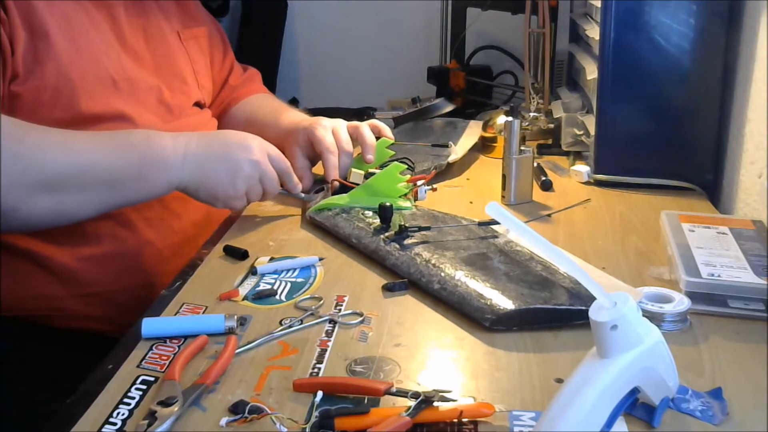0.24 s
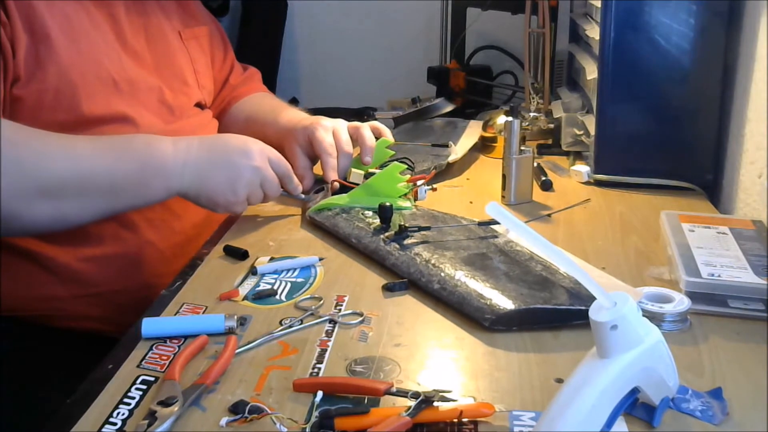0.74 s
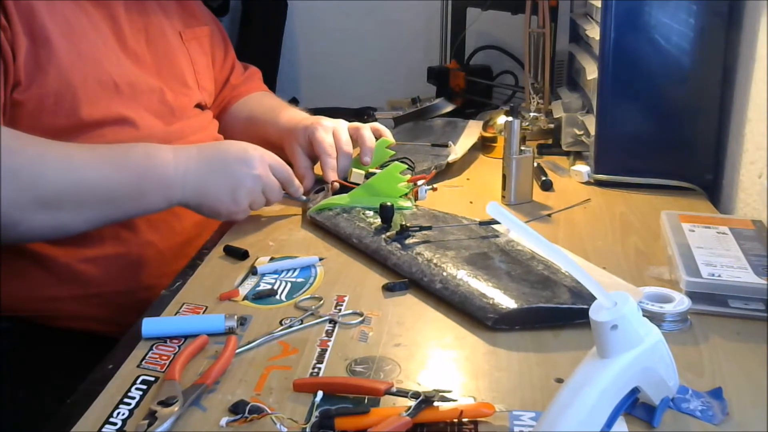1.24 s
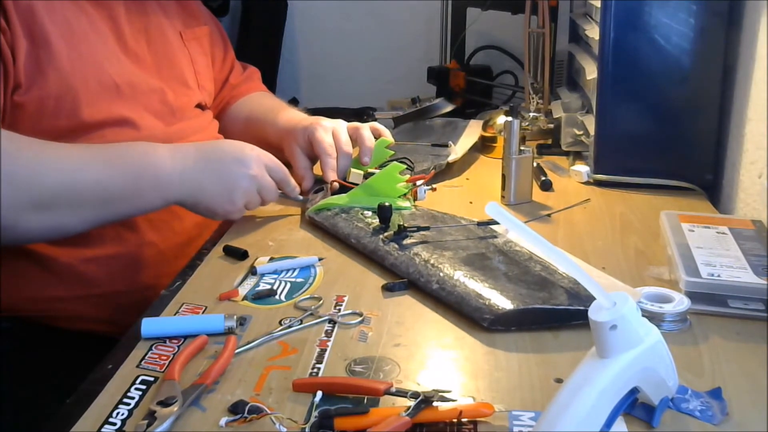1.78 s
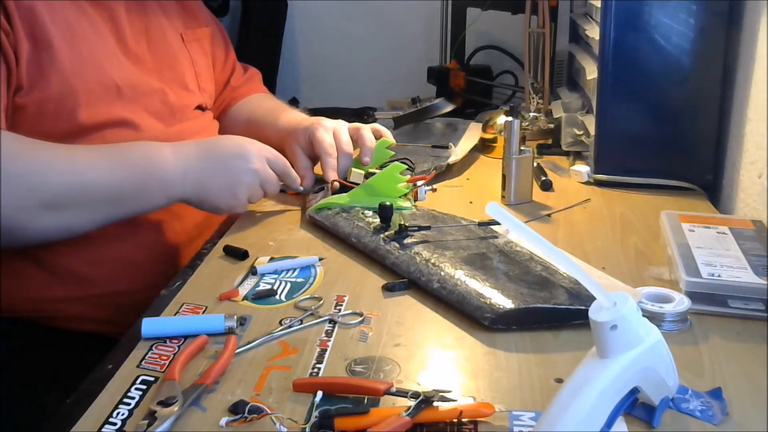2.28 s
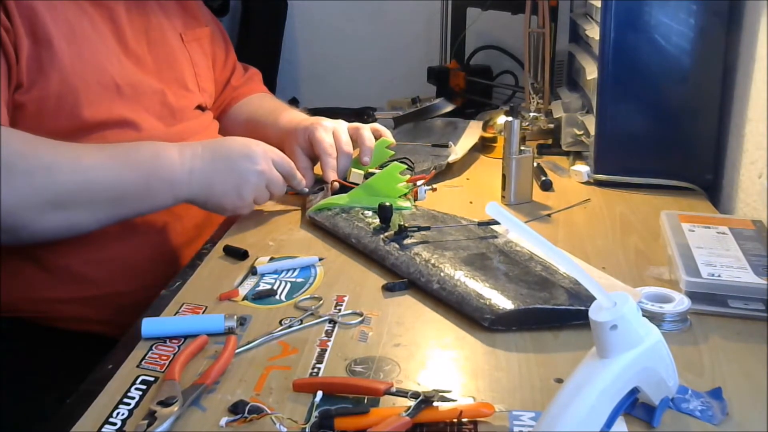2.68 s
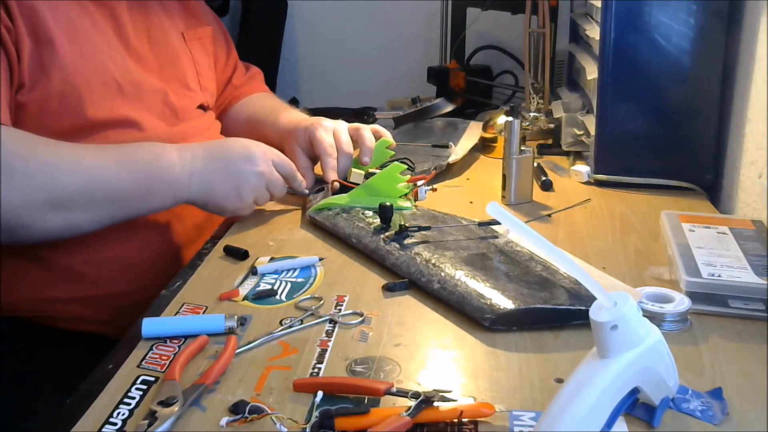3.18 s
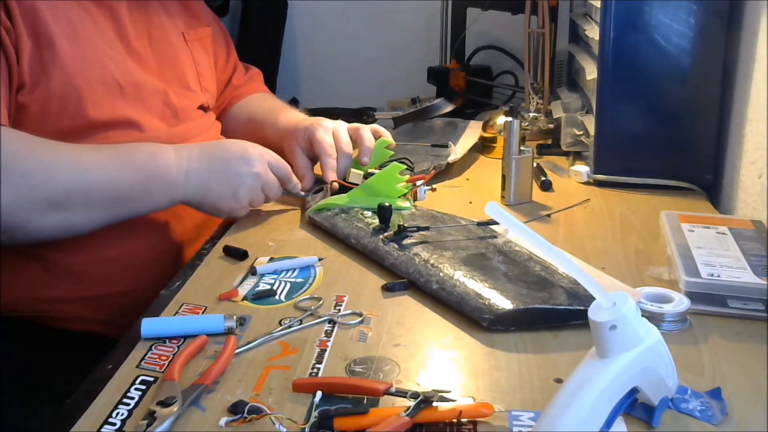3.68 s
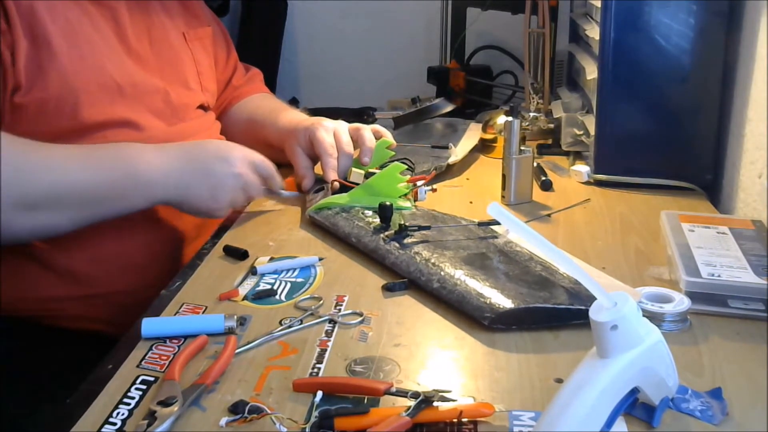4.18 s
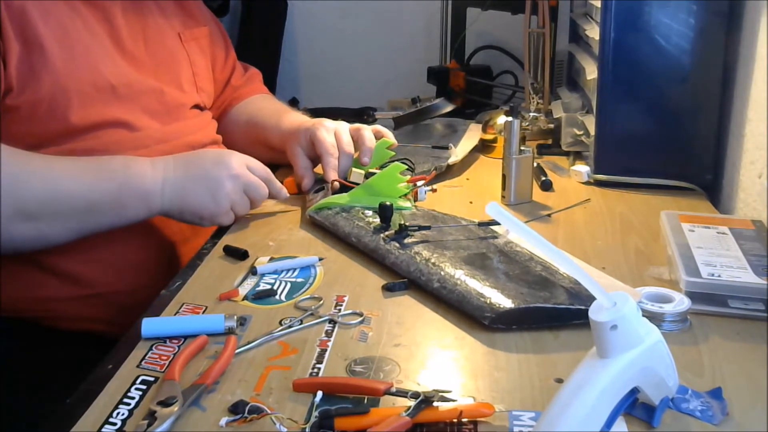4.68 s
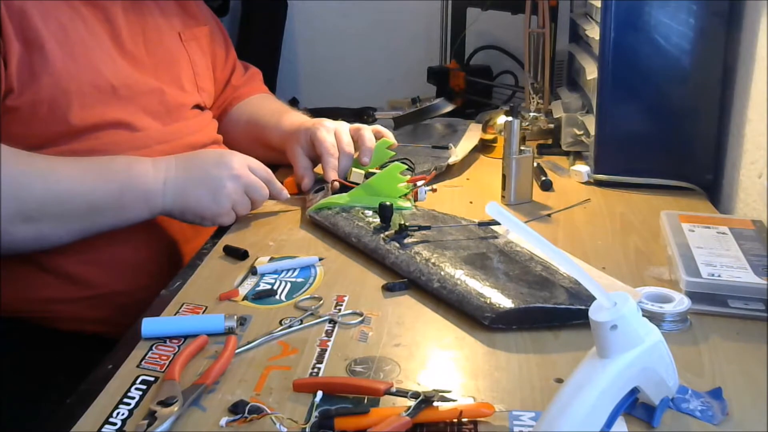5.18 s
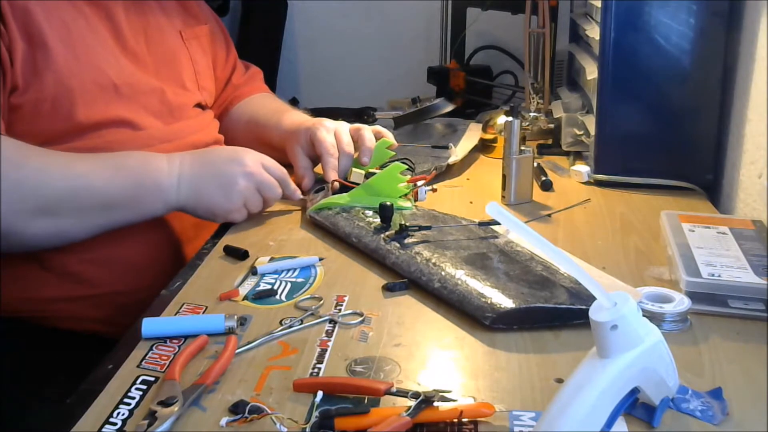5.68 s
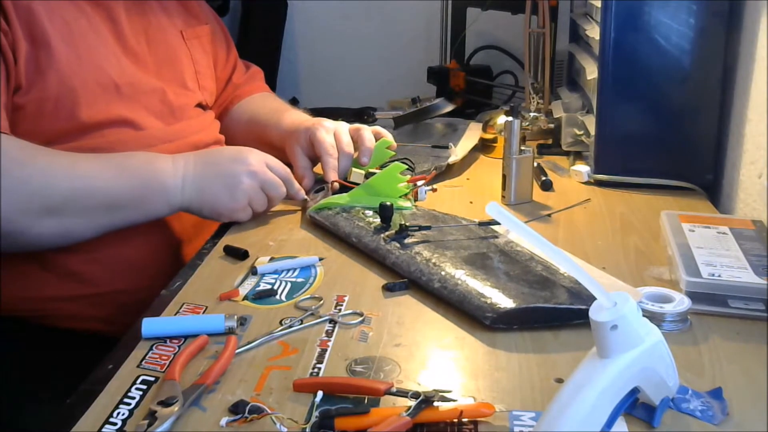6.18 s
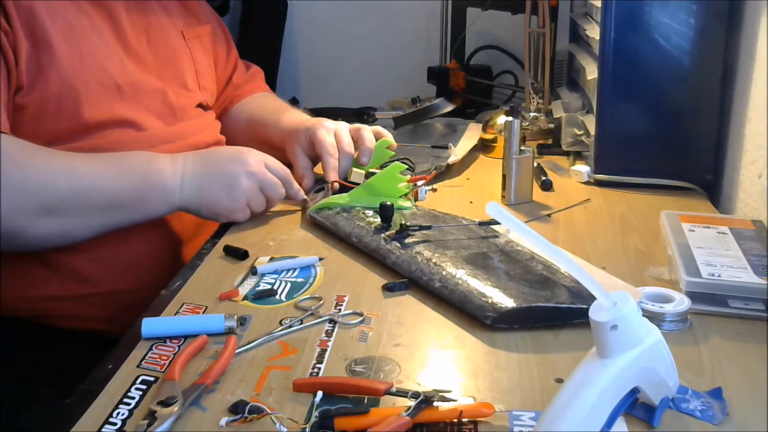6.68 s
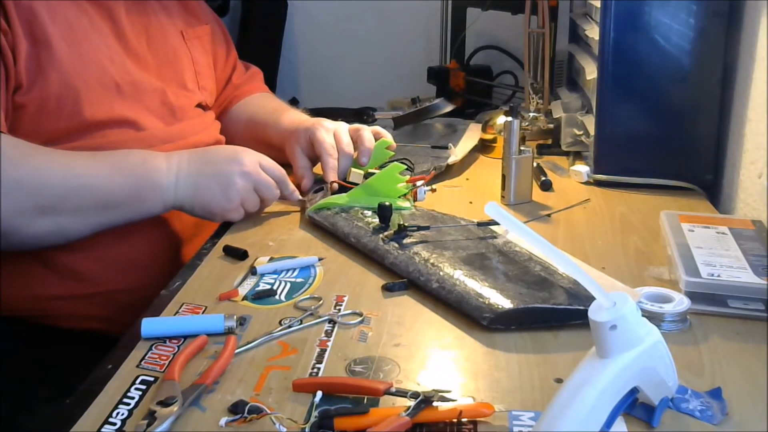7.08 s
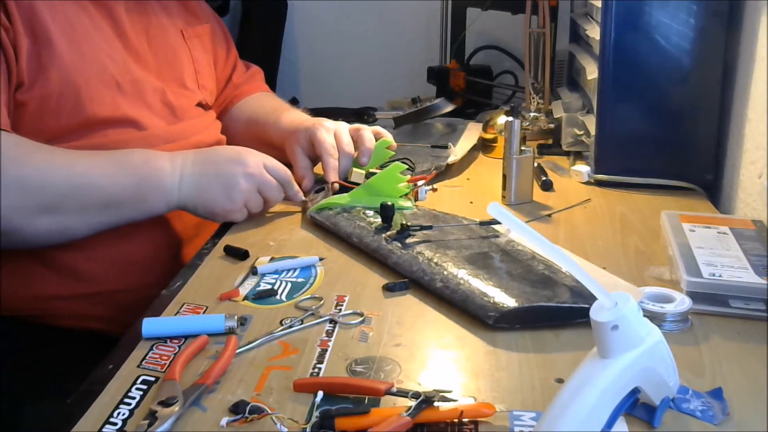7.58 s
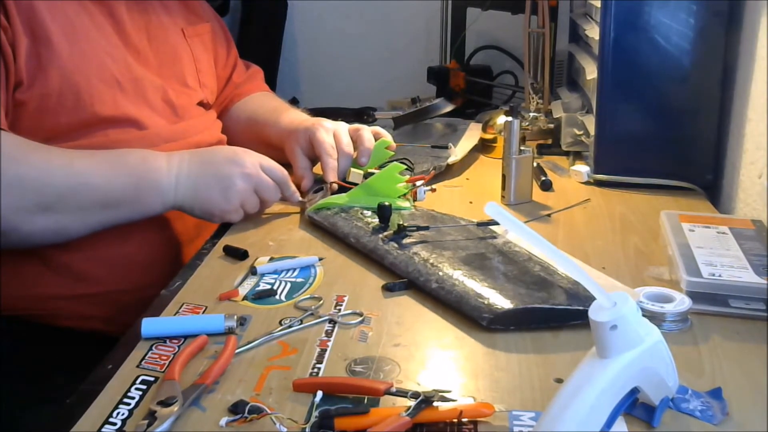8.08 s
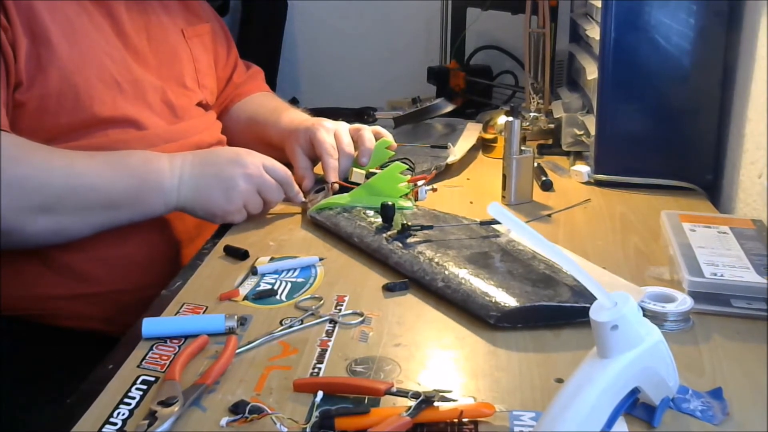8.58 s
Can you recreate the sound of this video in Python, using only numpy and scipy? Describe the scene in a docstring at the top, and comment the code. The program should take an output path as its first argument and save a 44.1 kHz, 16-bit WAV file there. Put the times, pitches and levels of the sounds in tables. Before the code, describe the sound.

Short, crisp rasps of a blade cutting foam, with brief pauses, sharp little cracks and hollow bumps on a workbench.

```python
"""Short, scratchy strokes: a knife saws and picks at a hollow-sounding foam wing on a workbench.
Each stroke crushes a swarm of tiny foam cells, whose ticks blur into a rasp. Now and then a foam bead
snaps, the blade creaks, or a push bumps the wing and the bench thuds. Fingers rub softly after strokes.
The bench top and a small, dry workshop add brief echoes, over a faint rumble and hiss
that a noise suppressor holds down."""
import sys
import numpy as np
from scipy import signal
from scipy.fft import rfft, irfft, next_fast_len
from scipy.io import wavfile
from scipy.ndimage import uniform_filter1d, map_coordinates

SR = 44100
rng = np.random.default_rng(int(sys.argv[2]) if len(sys.argv) > 2 else 0)


def bounce(signal):
    """Save signal as a 16-bit WAV file at the path given by the first command-line argument."""
    frames = np.transpose(np.atleast_2d(signal))
    limited = np.clip(frames, -1, 1)
    pcm = np.round(limited * 32767).astype(np.int16)
    wavfile.write(sys.argv[1], SR, pcm)


N = 390285

# Tone of the steady rumble and hiss: frequency_hz, level_db
BACKGROUND_TONE = [(25, -25), (60, -14), (90, -9), (130, -3), (230, 0), (400, -4), (600, -9), (1000, -12.5),
                   (2000, -16.5), (6500, -18), (9000, -28), (15600, -33)]
# How long the room takes to fade by 60 dB: frequency_hz, fade_s
ROOM_FADE = [(130, 0.23), (400, 0.18), (1200, 0.16), (3000, 0.18), (7000, .17), (14000, 0.062)]
# Echoes off the bench top and the things on it: delay_s, gain
BENCH_ECHOES = [(.00105, 0.25), (.002, 0.3), (.006, 0.25), (.008, .2), (0.0118, 0.24)]
# Foam creaking against the blade: start_s, pitch_hz, level_db
CREAKS = [(.464, 436.6, -41), (.526, 910, -45.5), (.705, 720, -43.5), (.812, 748, -38), (1.392, 873, -48),
          (1.449, 500, -50), (3.679, 780, -51), (4.664, 802, -50), (5.85, 420, -43), (6.295, 787, -53.5),
          (7.352, 844, -47.5), (8.084, 742, -48.5), (8.402, 748, -45.5)]
# Blade and hand bumping the wing: start_s, level_db, pitch_hz
BUMPS = [(0.268, -47, 240), (0.37, -35.5, 804), (0.469, -39.5, 382), (0.729, -37, 417), (.784, -31, 483),
         (0.948, -37.5, 390), (0.994, -38, 553), (1.208, -31, 950), (1.389, -38.5, 405),
         (1.533, -42.5, 470), (2.792, -34, 440), (3.093, -35, 340), (3.449, -39.5, 560),
         (3.582, -42.5, 326), (3.642, -36.5, 477), (3.758, -45, 446), (3.825, -34, 553),
         (4.032, -43.5, 440), (4.232, -44, 254), (5.951, -44, 458), (6.003, -40, 246), (6.67, -42.5, 550),
         (7.008, -37.5, 497), (7.185, -30.5, 446), (7.469, -23, 407), (7.654, -32.5, 360),
         (7.796, -21.5, 446), (7.958, -29, 388), (8.121, -22.5, 397), (8.297, -31, 408),
         (8.458, -24.5, 447), (8.708, -38.5, 295)]
# Tone of the wing's body: frequency_hz, level_db
WING_TONE = [(120, -22.5), (200, -8.5), (300, -8), (385, 1.5), (425, -5.5), (470, -1), (550, -8.5),
             (750, -7.5), (1000, -10.5), (1600, -16.5), (3000, -28.5), (6000, -59.5)]
# Tone of the bench's thud: frequency_hz, level_db
BENCH_TONE = [(60, -37), (100, -13), (130, -1.5), (155, -6.5), (190, 0), (260, -9), (400, -25), (1000, -69)]
# Foam beads breaking: start_s, level_db
SNAPS = [(.1311, -26), (.3322, -28), (0.5935, -24), (0.8176, -24.5), (1.2097, -20.5), (1.8424, -18),
         (2.3618, -24.5), (2.3928, -21), (2.4446, -13), (2.7503, -9.5), (3.0989, -9), (3.162, -10.5),
         (3.8304, -19.5), (4.1161, -26.5), (4.6183, -18.5), (5.2324, -29), (5.2846, -22), (5.3919, -31.5),
         (5.6412, -32), (6.003, -35.5), (6.101, -32), (6.694, -36.5), (6.714, -28), (6.812, -34),
         (7.138, -40), (7.3286, -27), (7.4703, -21.5), (7.8197, -24), (8.1238, -29), (8.772, -26.5),
         (8.791, -13.5)]
# Tone of crushed foam cells: frequency_hz, level_db
FOAM_TONE = [(240, -39.5), (450, -40.5), (700, -16.5), (1050, -15), (1450, -4.5), (1950, -13.5),
             (2800, -6.5), (4000, -8), (5300, -6.5), (6500, -1.5), (7600, -7), (8800, -11.5),
             (10800, -27.5), (15600, -52)]
# Knife strokes, each with its own low rasp and high fizz: start_s, length_s, level_db, rasp_db, fizz_db
STROKES = [(0, 0.012, -29, -0.5, -1.5), (0.114, 0.068, -23, -11.5, -6.5), (0.206, 0.023, -37.5, -13.5, -5),
           (0.313, 0.082, -27.5, -1.5, -1.5), (0.55, 0.062, -26, -7.5, -5.5), (0.709, 0.16, -54, 6, -5.5),
           (0.946, 0.105, -49, 3, -7), (1.163, 0.11, -37.5, 1.5, -4.5), (1.384, 0.06, -62, 19.5, -5.5),
           (1.61, 0.24, -42.5, 2, -6.5), (2.333, 0.12, -40, -7.5, -13.5), (2.444, 0.067, -29, -8, -9.5),
           (2.73, 0.094, -37, -8.5, -9.5), (2.881, 0.095, -31.5, -8, -6), (3.054, 0.12, -36.5, -11, -5.5),
           (3.263, 0.07, -32.0, -6, 4.5), (3.341, 0.03, -27.5, 0.5, -10), (3.44, 0.09, -38.5, -8.5, -5),
           (3.633, 0.064, -43.5, 0.5, -5), (3.805, 0.15, -42.5, -6, -10.5), (4.016, 0.1, -38, -4.5, -3.5),
           (4.607, 0.088, -44, -3, -10), (5.233, 0.24, -47, -10, -6.5), (5.464, 0.13, -35, -8, -3.5),
           (5.515, 0.16, -33.5, 0, -4), (5.648, 0.25, -46, -18, -9), (5.986, 0.13, -35, 0.5, -3.5),
           (6.259, 0.12, -58, 3.5, -4), (6.438, 0.08, -42.5, 1.5, 2.5), (6.638, 0.11, -46.5, 4, -7),
           (6.798, 0.062, -33, -1, -4), (6.988, 0.067, -41, 3.5, 1.5), (7.133, 0.08, -34.5, 1.5, -0.5),
           (7.299, 0.095, -42, -1.5, -7.5), (7.442, 0.098, -33.5, 0.0, -5), (7.612, 0.11, -38.5, -7, -6.5),
           (7.758, 0.1, -32, 2.5, -3.5), (7.952, 0.057, -38, 0.5, -7), (8.108, 0.049, -42.0, 12, -9.5),
           (8.268, 0.078, -41.5, -4, -9), (8.412, 0.14, -38.5, -2.5, -7.0), (8.773, 0.13, -37.5, -3, -10.5)]


def amp(db):
    """Turn decibels into a gain to multiply by."""
    return 10 ** (np.asarray(db) / 20)


def unit(x):
    """Scale a sound so its average strength (rms) is 1."""
    return x / np.sqrt(np.mean(x ** 2) + 1e-20)


def along(points, hz):
    """Read between the rows of a (frequency, value) table, on a log frequency scale."""
    frequencies, values = np.transpose(points)
    return np.interp(np.log(hz + 1), np.log(frequencies + 1), values)


def wobble(per_s, size):
    """A smooth curve through per_s random points a second."""
    points = rng.standard_normal(int(size * per_s / SR) + 4)
    return map_coordinates(points, [np.arange(size) * per_s / SR])


def add(track, start_s, sound):
    """Mix a sound into the track at start_s."""
    part = track[max(round(start_s * SR), 0):]
    part[:len(sound)] += sound[:len(part)]


def filtered(x, gain_at):
    """Turn each frequency up or down by gain_at(hz)."""
    size = next_fast_len(len(x) + SR // 10)
    return irfft(rfft(x, size) * gain_at(np.fft.rfftfreq(size, 1 / SR)), size)[:len(x)]


def noise(size, gain_at):
    """Noise of strength 1, with its tone shaped by gain_at(hz)."""
    return unit(filtered(rng.standard_normal(size), gain_at))


def sharpest_tick(gains):
    """The shortest tick with these gains across frequency (minimum phase)."""
    cepstrum = irfft(np.log(np.maximum(gains, 1e-6)))
    half = len(cepstrum) // 2
    cepstrum[1:half] *= 2
    cepstrum[half + 1:] = 0
    return irfft(np.exp(rfft(cepstrum)))


def background(level_db=-59):
    """Soft, steady room rumble and microphone hiss."""
    return amp(level_db) * noise(N, lambda hz: amp(along(BACKGROUND_TONE, hz)))


def workshop(x, tail_db=-1.5, gap_s=0.0033, delay_spread=0.06):
    """The room adds a few close echoes and a short tail, which change as the hands move."""
    out = np.zeros(N)
    hop = SR // 8
    padded = np.pad(x, (hop, 2 * hop))
    for start in range(0, N + hop, hop):  # each overlapping piece gets fresh echoes
        hz, t, bands = signal.stft(rng.standard_normal(SR // 4), SR, nperseg=256)
        fade = amp(-60 * t / along(ROOM_FADE, hz)[:, None])
        tail = signal.istft(bands * fade, SR, nperseg=256)[1]
        tail *= np.clip(np.arange(len(tail)) / SR / gap_s - 0.5, 0, 1)
        room = amp(tail_db) * tail / np.linalg.norm(tail)
        room[0] = 1  # the direct sound
        for delay_s, gain in BENCH_ECHOES:
            add(room, delay_s * (1 + delay_spread * rng.standard_normal()), np.array([gain]))
        piece = padded[start:start + 2 * hop] * signal.get_window("hann", 2 * hop)
        heard = signal.fftconvolve(piece, room / np.linalg.norm(room))
        add(out, max(start - hop, 0) / SR, heard[max(hop - start, 0):])
    return out


def finger_rubs(level_db=-61, scatter_db=3, max_lag_s=0.095, length_s=0.035, typical_hz=420):
    """After each stroke the fingers shift their grip with a brief, dull rub on the wing."""
    out = np.zeros(N)
    n = int(length_s * SR)
    for start_s, stroke_s, *_ in STROKES:
        centre_hz = typical_hz * np.exp(0.38 * rng.standard_normal())
        rub = noise(n, lambda hz: 1 / (1 + (4.1 * np.log((hz + 1) / centre_hz)) ** 2))
        rub_s = start_s + stroke_s + max_lag_s * rng.random()
        add(out, rub_s, amp(level_db + scatter_db * rng.standard_normal()) * rub * np.hanning(n))
    return out


def blade_creaks(length_s=0.027, waver=0.099, rough_db=5, overtone_db=-20):
    """The blade sticks and slips in step with one of the wing's natural notes."""
    out = np.zeros(N)
    n = int(length_s * SR)
    for start_s, pitch_hz, level_db in CREAKS:
        phase = 2 * np.pi * np.cumsum(pitch_hz * (1 + waver * wobble(150, n))) / SR
        tone = np.sin(phase) + amp(overtone_db) * np.sin(2 * phase)
        tone *= amp(rough_db * wobble(200, n))
        add(out, start_s, amp(level_db) * unit(tone) * np.sin(np.linspace(0, np.pi, n)))
    return out


def wing_bumps(ring_fade_s=0.042, chatter_fade_s=0.077, thud_fade_s=0.22, soft_push_db=-40):
    """A push rings the spot it meets, chatters through the wing and makes the bench thud."""
    out = np.zeros(N)
    t = np.arange(SR // 4) / SR
    wing_rise = 1 - np.exp(-t / 0.00017)
    bench_rise = 1 - np.exp(-t / 0.0069)
    for start_s, level_db, pitch_hz in BUMPS:
        push_db = level_db - soft_push_db
        ring = np.sin(2 * np.pi * pitch_hz * t + 0.58 * wobble(140, len(t)))
        ring *= amp(-3 - 60 * t / ring_fade_s)
        cutoff_hz = 1.7 * pitch_hz * amp(0.79 * max(push_db, 0))  # a harder push sounds brighter
        chatter = noise(len(t), lambda hz: amp(along(WING_TONE, hz)) / (1 + (hz / cutoff_hz) ** 4))
        chatter *= amp(-6 - 60 * t / chatter_fade_s)
        thud = noise(len(t), lambda hz: amp(along(BENCH_TONE, hz)))
        thud *= amp(-52 + 0.6 * push_db - 60 * t / thud_fade_s)
        add(out, start_s, amp(level_db) * (ring + chatter) * wing_rise + thud * bench_rise)
    return out


def cell_tick(rasp_db, fizz_db, rasp_hz=1540, fizz_hz=9300, spot_db=1.81, spot_width_hz=472.7):
    """One foam cell bursts: a deep bite adds low rasp, a light graze adds high fizz."""
    hz = np.fft.rfftfreq(1024, 1 / SR)
    bite_db = along([(705, rasp_db / 2), (rasp_hz, rasp_db), (5450, 0), (fizz_hz, fizz_db)], hz)
    # Each spot in the foam has a slightly different tone.
    ripple_db = np.interp(hz, np.arange(40) * spot_width_hz, spot_db * rng.standard_normal(40))
    return sharpest_tick(unit(amp(along(FOAM_TONE, hz) + ripple_db)) * amp(bite_db))


def stroke_tone_at(time_s):
    """The rasp and fizz of the stroke nearest this moment."""
    start_s, length_s, _, rasp_db, fizz_db = np.transpose(STROKES)
    nearest = np.argmin(np.abs(time_s - start_s - length_s / 2) - length_s / 2)
    return rasp_db[nearest], fizz_db[nearest]


def bead_snaps(tear_fade_s=0.0073, tear_gain=0.62, stroke_share=0.89):
    """A bead cracks and its neighbours tear just after, in a tone like the nearest stroke's."""
    out = np.zeros(N)
    t = np.arange(SR // 100) / SR
    for start_s, level_db in SNAPS:
        tear = rng.standard_normal(len(t)) * amp(-60 * t / tear_fade_s)
        tear *= tear_gain / np.linalg.norm(tear)
        tear[0] = 1  # the opening crack
        rasp_db, fizz_db = stroke_tone_at(start_s)
        tick = cell_tick(stroke_share * rasp_db - 1.5, stroke_share * fizz_db + 3)
        snap = signal.fftconvolve(tear, tick)
        # Give it the energy of 2 ms of steady crunching.
        snap *= np.sqrt(0.002 * SR) * np.linalg.norm(tick) / np.linalg.norm(snap)
        add(out, start_s, amp(level_db) * snap)
    return out


def blade_speed(length_s, rise_s=0.036, fall_s=0.027):
    """The blade speeds up from 0 to 1, holds and stops; a short stroke does so sooner."""
    t = np.arange(int(length_s * SR) + 2) / SR
    ramps = np.minimum(t / rise_s, (t[-1] - t) / fall_s)
    return np.minimum(ramps / min(ramps.max(), 1), 1)


def knife_strokes(cells_per_s=3000, scatter_db=5, catch_db=3.5, drag_db=2, rub_gain=0.43,
                  pops_per_s=70, pop_db=19):
    """The edge catches and slips, bursting cells in clumps, while the blade's side rubs the cut."""
    out = np.zeros(N)
    for start_s, length_s, level_db, rasp_db, fizz_db in STROKES:
        speed = blade_speed(length_s)
        n = len(speed)
        bursts = (rng.random(n) < cells_per_s / SR) * rng.choice([-1, 1], n)
        bursts = unit(bursts * amp(scatter_db * rng.standard_normal(n)))
        grip = amp(catch_db * wobble(260, n) + drag_db * wobble(90, n))
        rub = rub_gain * rng.standard_normal(n)
        crunch = unit((bursts + rub) * grip)
        # Tougher cell walls give way with a louder pop.
        pops = (rng.random(n) < pops_per_s / SR) * amp(pop_db) * rng.uniform(0.55, 1.4, n)
        scratch = signal.fftconvolve(speed * unit(crunch + pops), cell_tick(rasp_db, fizz_db))
        add(out, start_s, amp(level_db) * scratch)
    return out


def noise_suppressor(x, depth_db=-10, threshold_db=9, steepness=0.88):
    """Each frequency band is turned down as it nears its own noise floor, so tails end early."""
    bands = signal.stft(x, nperseg=512)[2]
    power = uniform_filter1d(np.abs(bands) ** 2, size=7, axis=0)  # smooth over frequency
    power = np.abs(uniform_filter1d(power, size=3, axis=1))  # then over time
    floor = np.percentile(power, 20, axis=1, keepdims=True) + 1e-20
    excess = (power / floor / amp(threshold_db) ** 2) ** steepness
    gain = amp(depth_db / (1 + excess))
    return signal.istft(bands * gain, nperseg=512)[1][:len(x)]


def scene():
    """Knife and wing in the workshop, over the background, in one channel."""
    cutting = knife_strokes() + bead_snaps() + wing_bumps() + blade_creaks() + finger_rubs()
    return (workshop(cutting) + background())[None]


def record(dry, low_cut_hz=85, high_cut_hz=15750):
    """Turn down steady noise, then cut the deep bass and the highest treble."""
    low_cut = signal.butter(4, low_cut_hz, "highpass", fs=SR, output="sos")
    cleaned = [signal.sosfilt(low_cut, noise_suppressor(channel)) for channel in dry]
    return np.array([filtered(channel, lambda hz: hz < high_cut_hz) for channel in cleaned])


dry = scene()
out = record(dry)
bounce(out)
```